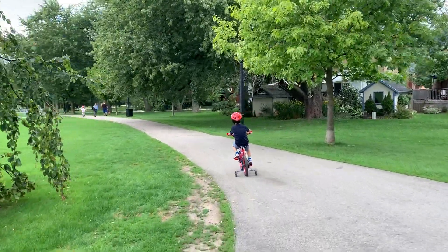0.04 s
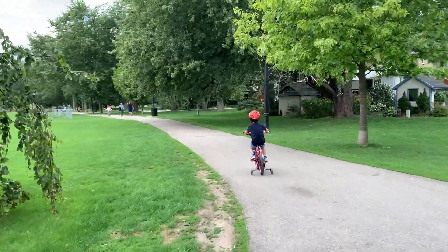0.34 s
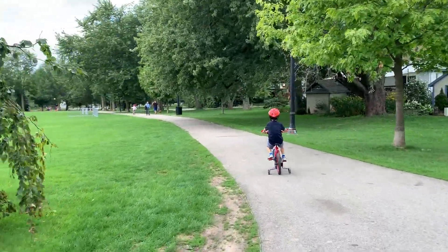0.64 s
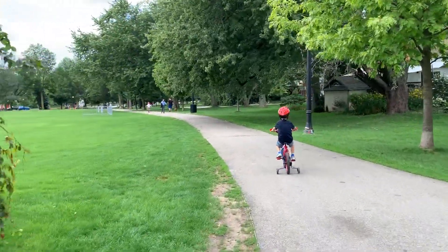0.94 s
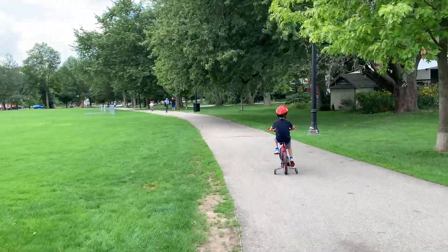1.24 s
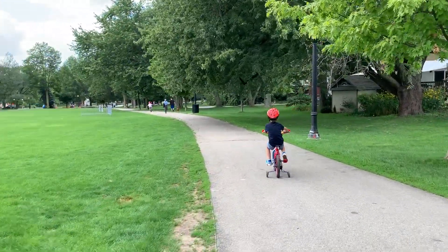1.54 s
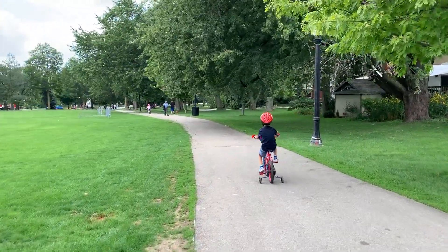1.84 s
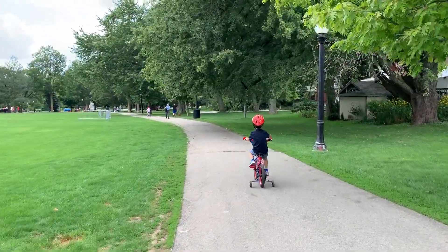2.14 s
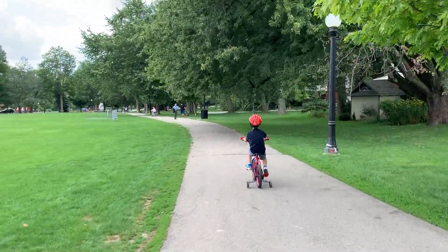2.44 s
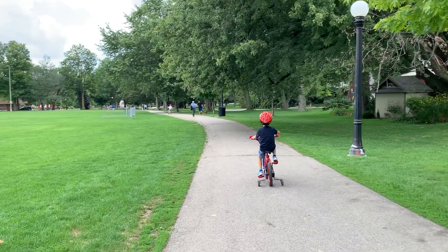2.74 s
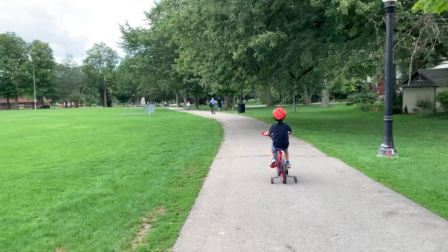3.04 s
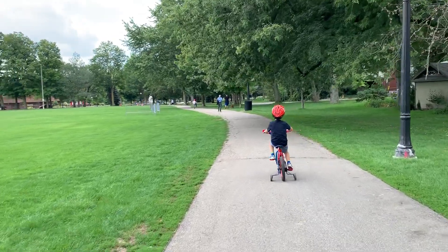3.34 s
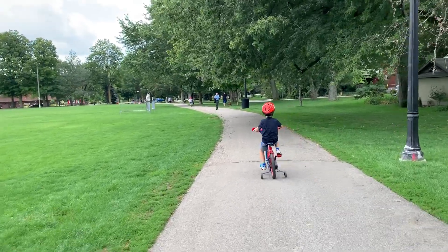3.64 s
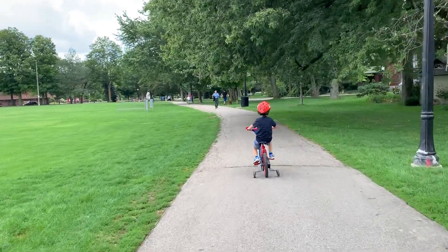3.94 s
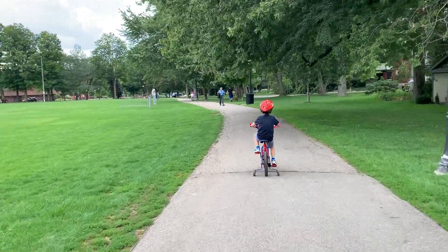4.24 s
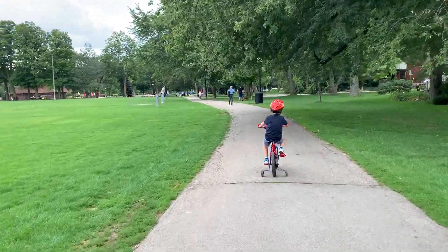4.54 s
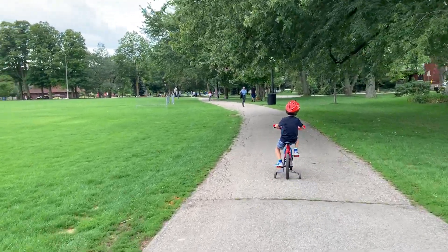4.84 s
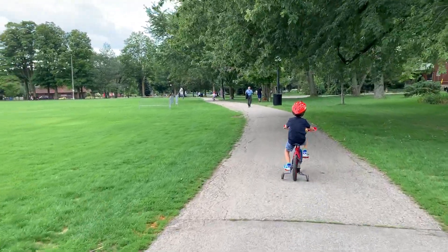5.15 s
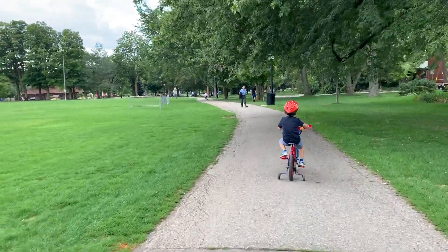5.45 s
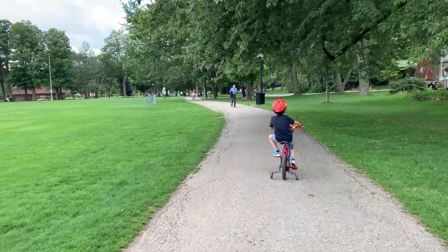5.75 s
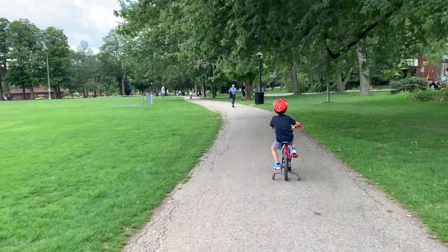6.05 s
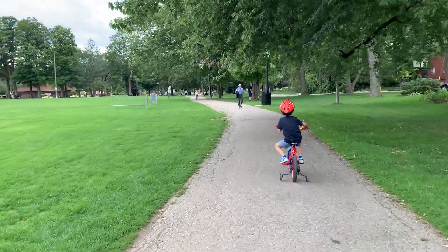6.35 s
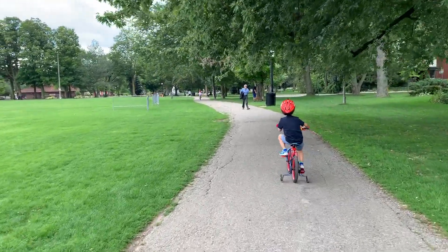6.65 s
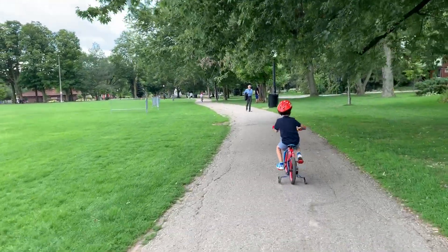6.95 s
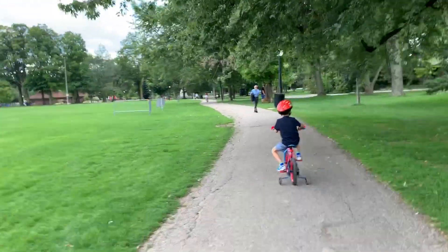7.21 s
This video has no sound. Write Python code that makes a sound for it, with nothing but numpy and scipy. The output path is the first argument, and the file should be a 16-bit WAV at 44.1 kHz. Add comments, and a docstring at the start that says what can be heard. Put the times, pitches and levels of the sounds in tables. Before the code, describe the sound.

A bicycle rolls along an asphalt park path, heard close up from a microphone carried on it. From the start the tyres give a hollow roar and gritty hiss with small stone snaps, the freewheel ticks softly, and gusty wind rumbles on the microphone. At about 1.6 seconds bumps knock the frame, loose metal chatters in bouts, and the shaken bell gives light, high jingles until about 3 seconds. One hard, hollow knock comes near 4 seconds. The metal chatter returns at 4.9 seconds, and a gust thumps the microphone at 5.2. The bell jingles again around 5.5 seconds with another hard knock, then briefly near 6.5 and 7.3, while knocks and rattles come and go to the end. A faint, steady wash of distant trees and town lies underneath throughout.

```python
"""An asphalt park path, heard close up from a two-port microphone carried on a bicycle.
From the start the tyres roar and hiss over grit, the freewheel ticks and wind rumbles on the ports.
At 1.6 s bumps knock the frame, loose metal chatters and the shaken bell jingles until about 3 s.
After one hard knock near 4 s the chatter returns at 4.9 s; an eddy thumps the microphone at 5.2 s,
and knocks and jingles come and go to the end. Trees and town wash faintly in the distance throughout."""
import sys
import numpy as np
from scipy import signal
from scipy.fft import rfft, irfft
from scipy.io import wavfile
from scipy.ndimage import uniform_filter1d

SR = 44100
rng = np.random.default_rng(int(sys.argv[2]) if len(sys.argv) > 2 else 0)


def store_wav(level_fs):
    """Save 16-bit WAV to argv[1]."""
    pcm = np.round(np.clip(np.atleast_2d(level_fs), -1, 1) * 32767)
    wavfile.write(sys.argv[1], SR, pcm.T.astype(np.int16))


N = 325458
TIME = np.arange(N) / SR
HZ = np.fft.rfftfreq(N, 1 / SR)


# Smooth asphalt under the bike: time_s, shaking_db, grit_db (relative to the shaking)
SMOOTH_ASPHALT = [(0, -60, 0.5), (1.05, -52, -3.5), (1.5, -56.5, -3.5), (2.3, -49.5, -3),
                  (3.8, -51.5, -1.5), (4.4, -49, -4), (4.8, -52, -3.5), (5.9, -49, -3), (6.25, -53, -10.5),
                  (6.55, -44.5, -3.5), (7.05, -47, -4.5), (7.38, -47.5, -7.5)]
# Rough stretches of the path: start_s, length_s, shaking_db
ROUGH_ASPHALT = [(-.02, 0.27, -44.5), (.25, 0.38, -46.5), (.43, 0.042, -49), (.55, 0.5, -47),
                 (1.33, 0.031, -48.5), (1.55, 0.22, -45), (1.8, 0.14, -51.5), (2.01, .13, -41.5),
                 (2.25, 0.077, -42), (2.41, .14, -42.5), (2.795, 0.048, -42.5), (2.95, 0.1, -43),
                 (3.125, 0.017, -44), (3.22, .72, -46.5), (3.96, 0.24, -41.5), (4.61, 0.12, -46.5),
                 (4.87, 0.49, -43.5), (5.53, 0.19, -44.5), (5.785, 0.1, -45), (5.9, 0.067, -39.5),
                 (6.0, 0.26, -50.5), (6.345, 0.45, -42), (6.89, 0.27, -43)]
def road(bumpy_db=1.32, bumpy_hz=12):
    """How hard the asphalt shakes the tyres and how much grit they meet: two uneven envelopes."""
    smooth = gain_of(curve(SMOOTH_ASPHALT))
    rough = swells(ROUGH_ASPHALT, rise_s=0.0088, fall_s=0.034)
    shaking = np.hypot(smooth, rough) * gain_of(bumpy_db * wander(bumpy_hz))
    grit = shaking * gain_of(curve(SMOOTH_ASPHALT, column=2))
    return shaking, grit


# Hollow resonances of the rolling tyres: base_pitch_hz, base_width_hz, relative_db
TYRE_MODES = [(456, 286, 3.5), (589, 263, 2), (949, 186, 4.5), (1396, 150, 2)]
# The roar's colour along the path: time_s, pitch_factor, boom_db (on the lowest resonance)
TYRE_DRIFT = [(0, 0.89, 6.5), (.6, 0.87, 0), (1.3, 0.93, -1.5), (1.6, 0.99, -29), (3.4, 0.96, 0.5),
              (4.5, 0.948, -4.5), (5.2, 1.047, -20.5), (7.38, 1.01, -0.5)]
# Hiss of grit under the tread: frequency_hz, relative_db
GRIT_SPECTRUM = [(200, 0), (750, -14), (1600, -3.5), (2150, 1), (2650, -4), (3100, -1), (4000, -6),
                 (5200, -11.5), (7100, -10), (7900, -15), (8800, -7.5), (12500, -13), (15500, -14)]
def tyres(shaking, grit, roar_db=-3.0, hiss_db=0.5, flicker_db=1.5, stones_per_s=1500, grit_per_s=5000):
    """The tread strikes the asphalt's stones: a hollow roar, and a grit hiss that flickers with it."""
    flicker = evened(gain_of(flicker_db * wander(43)))
    stones = impacts(stones_per_s) * flicker * gain_of(-2.0 * wander(250))
    drift, boom_db = curve(TYRE_DRIFT), curve(TYRE_DRIFT, column=2)
    roar = np.zeros((2, N))
    for k, (hz, width, db) in enumerate(TYRE_MODES):
        roar += gain_of(db + boom_db * (k == 0)) * resonate(stones, hz * drift, 0.89 * width)
    hiss = colour(impacts(grit_per_s) * flicker * grit, spectrum(GRIT_SPECTRUM))
    return gain_of(roar_db) * evened(roar) * shaking + gain_of(hiss_db) * hiss


def pebbles(grit, relative_db=-6, low_hz=1500, high_hz=4200, ring_s=0.013, each_per_s=9, pitches=16):
    """Single loose stones snap out from under the tread, each with a brief pitch of its own."""
    t = TIME[TIME < .04]
    out = np.zeros((2, N))
    for hz in np.geomspace(low_hz, high_hz, pitches):
        snap = np.exp(-t / ring_s) * np.sin(2 * np.pi * hz * t) / np.sqrt(hz)
        out += signal.oaconvolve(impacts(each_per_s), snap[None], axes=1)[:, :N]
    return evened(out) * grit * gain_of(relative_db)


# Patches of grit on the path: start_s, level_db, decay_s, centre_hz, width_hz
GRIT_PATCHES = [(0.442, -34.5, 0.05, 2040, 600), (0.73, -40.5, 0.018, 6000, 6000),
                (.757, -45.5, 0.084, 3200, 1200), (2.985, -44, 0.066, 1500, 1500),
                (3.986, -32, 0.0048, 2200, 3000), (4.615, -52, 0.012, 4000, 5000),
                (4.701, -40, 0.023, 2900, 1170), (5.533, -36.5, 0.013, 1500, 2500),
                (5.789, -42, 0.0093, 2800, 1500), (6.103, -50.5, .008, 3000, 5000),
                (6.298, -49.5, 0.0068, 3000, 5000), (6.52, -38, 0.1, 3580, 3000),
                (7.118, -37, 0.02, 2000, 4000)]
def crunches(grains_per_s=2500):
    """A patch of grit gives way under a tyre in a short spray of grains."""
    grains = impacts(grains_per_s)
    out = np.zeros((2, N))
    for start, db, decay, hz, width in GRIT_PATCHES:
        now = (TIME >= start) & (TIME < start + 6 * decay)
        spray = signal.lfilter(*signal.iirpeak(hz, hz / width, SR), grains[:, now])
        out[:, now] += gain_of(db) * evened(spray) * np.exp((start - TIME[now]) / decay)
    return out


# Bumps that knock the frame: start_s, relative_db
BUMPS = [(1.559, -32), (1.605, -27.5), (1.734, -44), (2.165, -28.5), (4.088, -22.5), (5.534, -20),
         (6.104, -29), (6.3, -35), (6.352, -31), (6.894, -25.5), (6.99, -29), (7.126, -20)]
# Resonances of the frame, close to the microphone: pitch_hz, width_hz, relative_db
FRAME_RING = [(600, 60, -1.5), (858, 6.7, 13.5), (1044, 29, 11), (1434, 106, 3.5), (1550, 58, -29.5),
              (2876, 120, 1), (3660, 24, 1)]
def frame(shaking, knock_db=-4, contact_s=0.0021, judder_db=-8, judders_per_s=170):
    """The frame and its fittings ring hollowly: hard on bumps, lightly all along the path."""
    knocks = bursts([(start, db + knock_db, contact_s) for start, db in BUMPS])
    blows = rng.standard_normal((2, N)) * knocks
    judder = impacts(judders_per_s) * shaking * gain_of(judder_db)
    return colour(blows + judder, resonances(FRAME_RING))


# Bouts of loose metal chattering on the bike: start_s, length_s, relative_db
CHATTER_BOUTS = [(1.562, 0.088, -43.5), (2.02, 0.28, -38), (2.425, 0.11, -39.5), (4.905, 0.38, -37.5),
                 (5.59, 0.084, -44.5), (5.81, 0.017, -40.5), (5.85, 0.068, -41), (6.36, 0.12, -40.5),
                 (6.46, 0.36, -39.5), (6.87, 0.039, -37.5), (7.0, 0.057, -55)]
# Hard clacks among the chatter: start_s, level_db, decay_s
METAL_CLACKS = [(1.598, -48, .008), (2.222, -48, .008), (5.04, -30, 0.0094), (5.622, -31, .012),
                (5.691, -29, .007), (7.12, -32.5, 0.0055)]
# Resonances dealt out among the loose parts: pitch_hz, width_hz, relative_db
METAL_RING = [(3620, 200, -18), (4120, 40, -15), (4800, 1200, -27), (5870, 40, -13), (6550, 220, -14),
              (7200, 240, -13), (8750, 550, -7), (9330, 300, -4), (10700, 220, -9), (11490, 150, -2),
              (12630, 50, 2), (13080, 190, -7), (13560, 90, -3), (14030, 110, -8), (14700, 160, -6),
              (15020, 220, -5)]
def chatter(bout_db=6, hits_per_s=1600, jolts_per_s=110, settle_s=0.015, uneven_db=0.5, parts=3):
    """Loose metal is jolted again and again: each jolt is a buzz of tiny hits, shared by a few parts."""
    jolts = signal.lfilter([1], [1, -np.exp(-1 / (settle_s * SR))], abs(impacts(jolts_per_s)[0]))
    bouts = gain_of(bout_db) * swells(CHATTER_BOUTS, rise_s=0.025, fall_s=0.044)
    shake = bouts * evened(1 + 0.88 * evened(jolts))
    clacks = bursts(METAL_CLACKS)
    out = np.zeros((2, N))
    for k in range(parts):
        part = resonances(METAL_RING[k::parts])
        share = np.linalg.norm(part) / np.linalg.norm(resonances(METAL_RING))
        force = shake * evened(gain_of(uneven_db * wander(35))) + clacks
        out += share * colour(impacts(hits_per_s) * force, part)
    return out


# Jolts that throw the striker against the bell: start_s, relative_db, low_partials_db, touch_count
BELL_JOLTS = [(1.66, -41.5, -9, 1), (1.722, -34, -12.5, 3), (1.824, -35.5, -10, 1), (2.003, -38.5, -7.5, 3),
              (2.1, -32.5, -1.5, 2), (2.516, -32, -9.5, 1), (2.557, -30.5, -5.5, 4),
              (2.862, -31.5, -9.5, 1), (2.904, -32, -9.5, 2), (2.968, -31, -3, 2), (3.027, -40.5, -3, 1),
              (3.845, -41.5, -14, 1), (5.418, -42, -6, 1), (5.491, -35, -11, 2), (5.561, -34, -18, 1),
              (6.524, -37, -7, 3), (7.339, -38.5, -8, 1)]
def striker_touches(bounce_s=0.025, timing_scatter=.15, scatter_db=2.5):
    """The striker bounces on the bell; rows of start_s, relative_db, low_partials_db, top_partials_db."""
    rows = []
    for start, db, low_db, count in BELL_JOLTS:
        for k in range(round(count)):
            late, hard = rng.standard_normal(2) * (k > 0)
            touch_s = start + bounce_s * (k + timing_scatter * late)
            # with each bounce the low partials build up and the top ones fade
            rows.append((touch_s, db + scatter_db * hard, low_db + 0.5 * k, -3 - 1.5 * k))
    return sorted(rows)


# The bell's partials, in close groups that beat: pitch_hz, relative_db, t60_s
BELL_PARTIALS = [(4090, -10, 1.2), (4120, -8, 1.2), (7064, -13, .7), (7135, -1, .6), (10642, -4, .36),
                 (10742, -2, .38), (14790, -14, .3), (14940, -1, .28), (15015, -12, .28)]
def bell(ring_db=-1, hum_db=-0.5, hum_rise_s=0.004, buzz_db=2.5, tick_db=-13, tick_s=0.0038):
    """Each touch of the striker ticks, stops the old ring and starts a new one; the split pairs beat."""
    touch_s, touch_db, low_db, top_db = np.transpose(striker_touches())
    latest = np.maximum(np.searchsorted(touch_s, TIME, side="right") - 1, 0)
    since = np.maximum(TIME - touch_s[latest], 0)
    struck = TIME >= touch_s[0]
    buzz = gain_of(buzz_db * wander(53))
    port_hz, port_lead, _ = np.transpose(MICROPHONE_PORTS)
    tones = np.zeros((2, N))
    for hz, partial_db, t60 in BELL_PARTIALS:
        strength_db = touch_db + partial_db + low_db * (hz < 9000) + top_db * (hz > 13000)
        # the phase jumps at each touch and wobbles in between
        phase = 2 * np.pi * rng.random() + np.cumsum(rng.standard_normal(len(touch_s)))[latest]
        phase += wander(31)
        ring = gain_of(strength_db)[latest] * np.exp(-np.log(1000) * since / t60) * struck
        if hz < 5000:  # the striker barely touches the lowest pair: it swells and fades more steadily
            step = 1 / (hum_rise_s * SR)
            ring = gain_of(hum_db) * signal.lfilter([step], [1, step - 1], ring)
            phase = phase / 2
        else:
            ring = ring * buzz
        tone = uniform_filter1d(ring * np.exp(1j * phase), size=48) * np.exp(2j * np.pi * hz * TIME)
        right_lag = np.exp(-1j * np.interp(hz, port_hz, port_lead))
        tones += np.array([tone, tone * right_lag]).real
    bright_noise = np.diff(rng.standard_normal((2, N + 1)))
    ticks = bright_noise * gain_of(touch_db + tick_db)[latest] * np.exp(-since / tick_s) * struck
    return np.sqrt(2) * gain_of(ring_db) * tones + ticks


# Resonances of the pawl in the rear hub: pitch_hz, width_hz, relative_db
PAWL_RING = [(2440, 100, -9), (4350, 250, -13), (5350, 140, 0), (6500, 3500, -21)]
def freewheel(level_db=-60.5, ticks_per_s=28.3, first_s=.031, scrape_s=.007, uneven_db=1):
    """The pawl pings softly over one ratchet tooth after another."""
    since = (TIME - first_s) % (1 / ticks_per_s)
    ticks = evened(np.exp(-since / scrape_s) * gain_of(uneven_db * wander(6.2)))
    return gain_of(level_db) * colour(rng.standard_normal((2, N)) * ticks, resonances(PAWL_RING))


# Deep rumble of air right on the microphone: frequency_hz, relative_db
WIND_RUMBLE = [(15, -1.5), (28, -0.5), (45, 3), (90, -2.5), (130, -8), (220, -25.5), (500, -53.5)]
# Flutter above the rumble: frequency_hz, relative_db
WIND_FLUTTER = [(60, -26), (120, -6.5), (200, 0), (300, -9), (450, -13), (900, -38.5), (2000, -77)]
# Gusts on the microphone: start_s, length_s, relative_db
WIND_GUSTS = [(.13, 0.038, -36), (.56, 0.044, -31.5), (.66, 0.13, -34), (.88, 0.2, -31.5),
              (1.21, 0.076, -29.5), (1.54, 0.28, -38.5), (1.71, 0.048, -25.5), (1.81, 0.097, -24),
              (1.975, 0.069, -23), (2.095, 0.088, -25), (2.29, 0.26, -29.5), (2.55, .18, -35),
              (2.97, 0.034, -40), (3.39, 0.42, -32.5), (3.91, 0.071, -25), (3.98, 0.17, -37.5),
              (4.11, 0.14, -34.5), (4.7, 0.21, -36.5), (4.89, 0.26, -32), (5.17, 0.045, -22),
              (5.27, 0.088, -25), (5.39, 0.12, -32.5), (5.54, 0.043, -29), (6.34, 0.045, -35),
              (6.45, 0.039, -32), (6.59, 0.045, -33.5), (6.69, .04, -31.5), (6.8, 0.028, -29.5),
              (6.98, 0.15, -35), (7.13, 0.29, -29.5)]
def wind(breeze_db=-40.5, rumble_db=0.5, flutter_db=-15.0, lumpy_db=4.5):
    """Turbulence at the ports: a deep rumble and a lumpy flutter above it, both following the gusts."""
    rumble = colour(rng.standard_normal((2, N)), spectrum(WIND_RUMBLE))
    flutter = colour(rng.standard_normal((2, N)), spectrum(WIND_FLUTTER))
    flutter *= evened(gain_of(lumpy_db * wander(30)))
    strength = np.hypot(gain_of(breeze_db), swells(WIND_GUSTS, rise_s=0.012, fall_s=0.021))
    return strength * (gain_of(rumble_db) * rumble + gain_of(flutter_db) * flutter)


# The strongest eddies, which thump the microphone: centre_s, relative_db, pitch_hz
WIND_THUMPS = [(0.901, -18.5, 106), (1.248, -16.5, 171), (1.279, -16, 198), (1.737, -15, 80),
               (1.751, -20, 127), (1.838, -22, 148), (1.858, -13, 108), (2.008, -12.5, 177),
               (2.097, -24, 150), (2.492, -11.5, 312), (2.638, -25, 171), (2.712, -25.5, 168),
               (3.672, -18, 186), (3.724, -20.5, 148), (5.206, -5, 183), (5.275, -17.5, 157),
               (5.57, -18.5, 92), (6.354, -22, 141), (6.469, -24.5, 153), (6.819, -23, 206),
               (7.151, -19.5, 165), (7.252, -20.5, 193)]
def eddies(trim_db=-1, width_cycles=0.5):
    """Each vortex sweeping past is a quick dip of pressure between two swells."""
    out = np.zeros(N)
    for centre, db, hz in WIND_THUMPS:
        near = abs(TIME - centre) < .05
        cycles = (TIME[near] - centre) * hz
        envelope = gain_of(db + trim_db) / (1 + (cycles / width_cycles) ** 2) ** 2
        out[near] -= envelope * np.cos(2 * np.pi * cycles)
    return out


# Trees and town, far from the path: frequency_hz, relative_db
DISTANT_WASH = [(100, -6), (300, 1.5), (550, -4.5), (750, -21.5), (900, -7.5), (1500, -12), (2400, -14),
                (4800, -15.5), (15000, -71)]
def park(level_db=-57):
    """The steady far wash of trees and town."""
    return gain_of(level_db) * colour(rng.standard_normal((2, N)), spectrum(DISTANT_WASH))


# The two ports of the microphone on the bike: frequency_hz, left_lead_rad, likeness (0-1)
MICROPHONE_PORTS = [(0, 0, .9), (300, 0, .93), (1000, 0, .82), (1400, -.5, .65), (1600, -1.8, .5),
                    (1850, -.6, .65), (2100, -.6, .55), (2350, .7, .65), (2750, 1.7, .7), (3300, 2.3, .72),
                    (4120, 2.3, .55), (4500, 4.3, .55), (5300, 5.8, .4), (5800, 5.2, .35), (6400, 7.6, .35),
                    (6800, 8, .6), (7800, 6.3, .96), (9820, np.pi, .985), (11600, 0, .985),
                    (13480, -np.pi, .985), (15400, -6.3, .97)]
def microphone(pair):
    """Makes two unrelated signals as alike as the ports hear them, and sets the phase between them."""
    hz, lead, likeness = np.transpose(MICROPHONE_PORTS)
    likeness = np.interp(HZ, hz, likeness)
    left, unrelated = rfft(pair)
    right = likeness * left + np.sqrt(1 - likeness ** 2) * unrelated
    right *= np.exp(-1j * np.interp(HZ, hz, lead))
    return irfft(np.array([left, right]), N)


def gain_of(db):
    """Decibels to amplitude."""
    return 10 ** (np.asarray(db) / 20)


def evened(x):
    """Scales to rms 1."""
    return x / np.sqrt(np.mean(x ** 2) + 1e-20)


def curve(rows, column=1):
    """One column of a time table at every sample."""
    rows = np.asarray(rows)
    return np.interp(TIME, rows[:, 0], rows[:, column])


def swells(rows, rise_s, fall_s):
    """Envelope of events that rise, hold to the end of their length and die away; their powers sum."""
    power = np.zeros(N)
    for start, length, db in rows:
        first = np.searchsorted(TIME, start)
        t = TIME[first:][:round((length + 8 * fall_s) * SR)] - start
        shape = np.minimum(t / rise_s, 1) * np.exp(-np.maximum(t - length, 0) / fall_s)
        power[first:first + len(t)] += (gain_of(db) * shape) ** 2
    return np.sqrt(power)


def bursts(rows):
    """Envelope of sudden bursts that die away."""
    out = np.zeros(N)
    for start, db, decay in rows:
        out += gain_of(db) * (TIME >= start) * np.exp(-abs(TIME - start) / decay)
    return out


def wander(rate_hz):
    """Smooth random motion of rms 1, mostly slower than the given rate."""
    return evened(irfft(rfft(rng.standard_normal(N)) / (1 + (HZ / rate_hz) ** 4), N))


def impacts(per_s):
    """Random tiny impacts in two channels, rms 1."""
    return evened(rng.standard_normal((2, N)) * (rng.random(N) < per_s / SR))


def spectrum(points):
    """Gain at every frequency from rows of frequency_hz, relative_db."""
    hz, db = np.transpose(points)
    return gain_of(np.interp(np.log(HZ + 1), np.log(hz), db))


def resonances(modes):
    """Gain at every frequency of a set of modes."""
    return np.sqrt(sum(gain_of(db) ** 2 / (1 + (2 * (HZ - hz) / width) ** 2) for hz, width, db in modes))


def colour(x, gain):
    """Causal filter of unit power: clicks ring after they land."""
    log_gain = np.log(np.maximum(evened(gain), 1e-5))
    cepstrum = irfft(log_gain, N) * (1 + np.sign(N / 2 - np.arange(N)))
    cepstrum[0] /= 2
    return irfft(rfft(x) * np.exp(rfft(cepstrum)), N)


def resonate(x, hz, width):
    """A resonance of gain 1 that follows the curve hz, applied twice for steep sides."""
    carrier = np.exp(2j * np.pi * np.cumsum(hz) / SR)
    pole = np.exp(-np.pi * width / SR)
    return 2 * (carrier * signal.lfilter([(1 - pole) ** 2], [1, -2 * pole, pole ** 2], x / carrier)).real


def scene():
    """Bicycle close by, wind on the ports, park far off; the road drives tyres, pebbles and frame."""
    shaking, grit = road()
    bicycle = tyres(shaking, grit) + pebbles(grit) + crunches() + frame(shaking) + chatter() + freewheel()
    return microphone(wind() + park() + bicycle) + eddies() + bell()


def record(dry):
    """The recorder's band limit cuts the highest treble."""
    lowpass = signal.firwin(511, cutoff=15850, window=("kaiser", 9), fs=SR)
    return signal.oaconvolve(dry, lowpass[None], "same")


dry = scene()
out = record(dry)
store_wav(out)
```